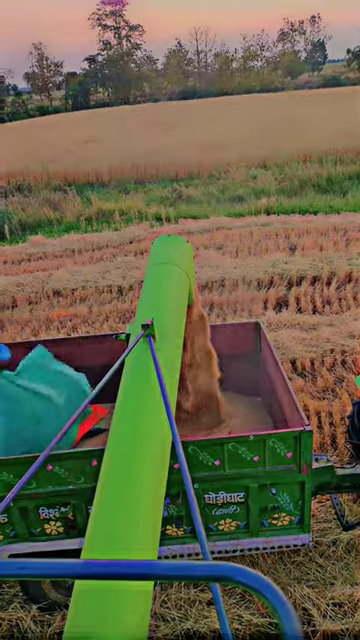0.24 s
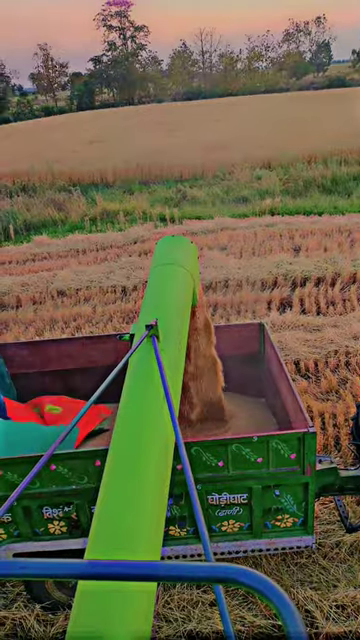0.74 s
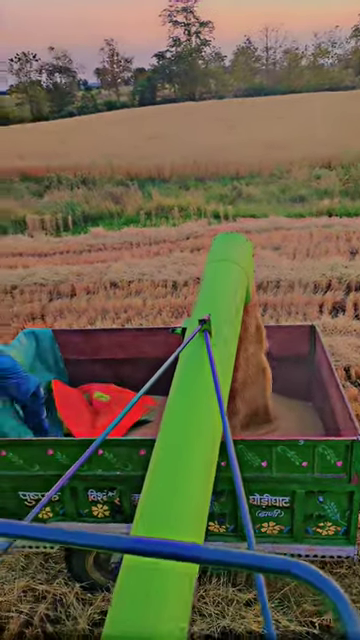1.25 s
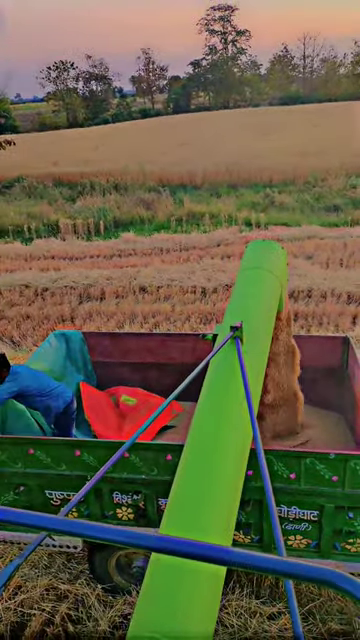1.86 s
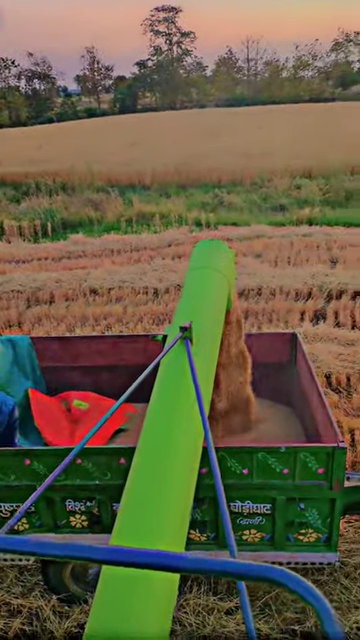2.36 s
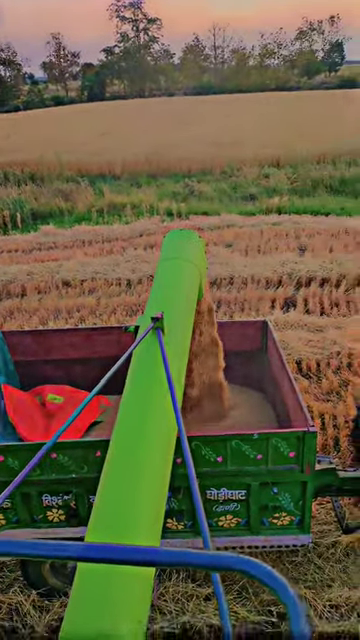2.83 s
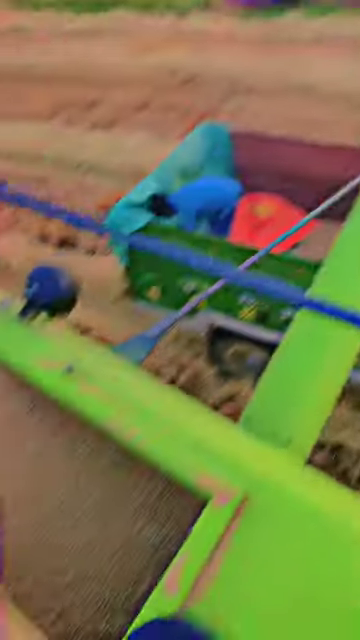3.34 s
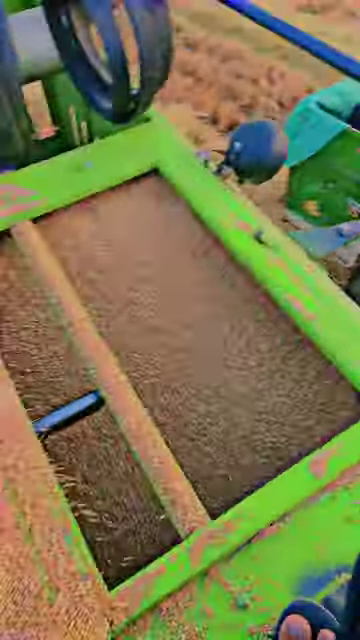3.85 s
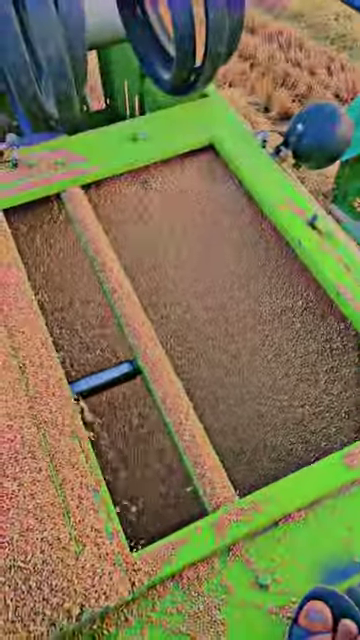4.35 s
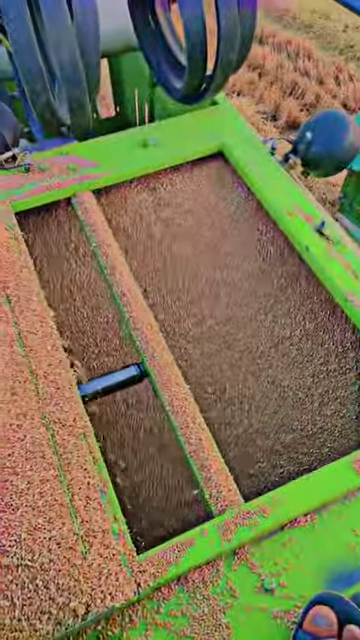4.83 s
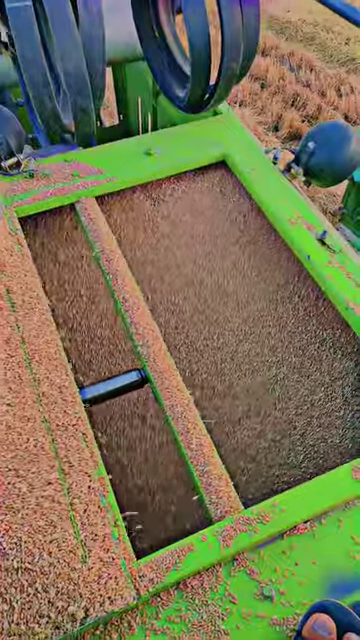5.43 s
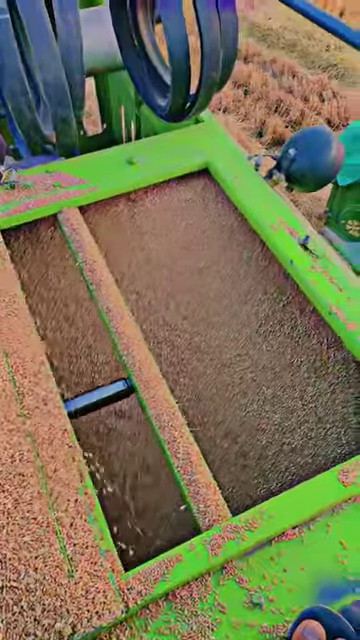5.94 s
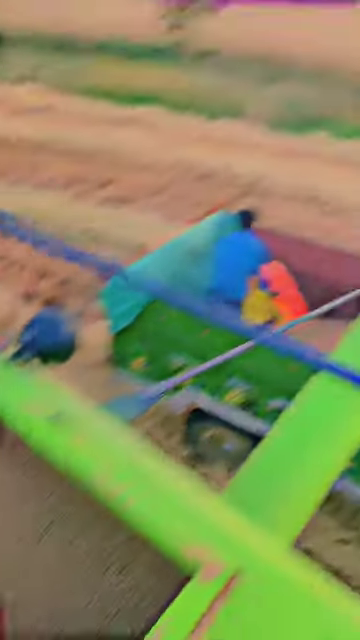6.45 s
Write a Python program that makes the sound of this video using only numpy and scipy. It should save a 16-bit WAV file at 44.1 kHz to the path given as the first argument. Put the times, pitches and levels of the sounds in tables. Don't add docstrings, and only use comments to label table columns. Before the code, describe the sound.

Continuous harvester machinery in an open field, heard from a handheld phone on top of the grain tank. Engine hum, auger drone and rattling panels fill everything, with thin whines and a fine kernel hiss above. It starts suddenly, slightly brighter for half a second, with rhythmic fading squeaks; later it becomes duller and boxier over the tank, with belt squeals near the middle and one faint squeal at the end.

```python
import sys
import numpy as np
from scipy import signal
from scipy.fft import rfft, irfft, next_fast_len
from scipy.io import wavfile
from scipy.ndimage import uniform_filter1d

SR = 44100
rng = np.random.default_rng(int(sys.argv[2]) if len(sys.argv) > 2 else 0)


def attenuation_scalar(level_db):
    decades = np.asarray(level_db, float) / 20
    return 10 ** decades


def wrap_up_sound(samples):
    columns = np.atleast_2d(samples).T
    tamed = np.clip(columns, -1, 1)
    steps = np.round(tamed * 32767).astype(np.int16)
    wavfile.write(sys.argv[1], SR, steps)


N = 295029
TIME = np.arange(N) / SR
START_S = .2513
CYCLE_HZ = 13.965
AUGER_HZ = 8.404


def columns(table):
    s, *rest = np.transpose(table)
    return [np.interp(TIME, s, c) for c in rest]


def unit(x):
    return x / np.sqrt(np.mean(x ** 2))


def colour(x, spectrum):
    hz, db = np.transpose(spectrum)
    size = next_fast_len(N)
    log_f = np.log(np.maximum(np.arange(size // 2 + 1) * SR / size, 1))
    log_hz = np.log(hz)
    outside = np.maximum(log_hz[0] - log_f, 0) + np.maximum(log_f - log_hz[-1], 0)
    gain = attenuation_scalar(np.interp(log_f, log_hz, db) - 60 * outside)
    return unit(irfft(rfft(x, size) * gain, size)[:N])


def walk(rate):
    hold = int(SR / rate)
    steps = np.repeat(rng.standard_normal(N // hold + 1), hold)
    return 1.06 * uniform_filter1d(uniform_filter1d(steps, hold), hold)[:N]


def beat(hz, duty, start):
    return np.exp(-((hz * TIME + start) % 1) / duty)


def particles(rate):
    return unit((rng.random(N) < rate / SR) * rng.standard_normal(N))


def tones(rows, waver_db, slip):
    out = np.zeros(N)
    for hz, db in rows:
        phase = 2 * np.pi * (hz * TIME + rng.random()) + slip * walk(3.04)
        out += np.sqrt(2) * attenuation_scalar(db + waver_db * walk(4.05)) * np.sin(phase)
    return out


def pose():
    # (time [s], share along the auger [0-1], share over the tank [0-1])
    aim = [
        (.25, 0.9, 0.07),
        (1.9, 0.69, 0.04),
        (2.4, 0.3, 0),
        (3.2, 0.21, 0.04),
        (3.5, 0.35, 0.16),
        (3.9, 0.2, 0.69),
        (6.0, 0.09, 0.77),
        (6.3, 0.17, 0.62),
        (6.69, 0.26, 0.2),
    ]
    along, tank = np.clip(columns(aim), 0, 1)
    return along, np.clip(1 - along - tank, 0, 1), tank


def heard(along_db, side_db, tank_db, unsettled_db, share, lead_s=0, opening_db=0):
    # (time [s], gain [dB])
    sway = [(.27, 1.5), (.4, -0.5), (.6, 0.3), (.7, -.8), (1.0, 1), (1.5, -1), (1.8, 0.1), (2.5, -0.24),
            (3.2, -0.7), (3.55, 0.6), (4.0, 0.4), (4.5, -0.6), (5.0, 0.4), (5.5, -.5), (5.75, -0.8),
            (6.0, -1.5), (6.45, 0), (6.69, 0.6)]
    settle_s, fade_s, opening_s = .64, 0.13, 0.055
    along, side, tank = pose()
    unsettled = np.clip(1 - (TIME + lead_s - settle_s) / fade_s, 0, 1)
    opening = np.exp(-np.maximum(TIME - START_S, 0) / opening_s)
    posed = (along * along_db + side * side_db + tank * tank_db) / (along + side + tank)
    return posed + unsettled_db * unsettled + opening_db * opening + share * columns(sway)[0]


def handling():
    settle = np.interp(TIME, [.3, .66, .72], [-56, -56, -68])
    rumble = colour(rng.standard_normal(N), [(15, 8.5), (40, 3.5), (90, -2), (130, -19.0)]) * attenuation_scalar(settle)
    from_bump = ((TIME - .6022) / .0011) ** 2
    return rumble - attenuation_scalar(-19) * (1 - .6 * from_bump) * np.exp(-.5 * from_bump)


def drone():
    # (frequency [Hz], level [dB per Hz])
    spectrum = [(40, -39.5), (62, -48.5), (80, -25.5), (107, -16.5), (157, -7), (221, -4.5), (256, -4.5),
                (301, -3.5), (342, -6), (406, -7), (510, -19), (620, -19.5)]
    puffs = 1 + .15 * beat(6 * CYCLE_HZ, .3, 0) * attenuation_scalar(3 * walk(60))
    return colour(puffs * rng.standard_normal(N), spectrum) * attenuation_scalar(.6 * walk(6))


def engine():
    # (multiple of the engine cycle [1], level [dB rms])
    exhaust_orders = [(6, -66), (8, -61), (10, -43), (11, -45), (12, -36), (18, -37), (45, -52.5),
                      (74, -52), (75, -50.5), (77, -54), (80, -50.5), (81, -52), (84, -52.5), (90, -64),
                      (98, -51), (104, -61), (108, -52.5)]
    # (multiple of the shaft turn [1], level [dB rms])
    auger_orders = [(33, -47), (38, -46), (39, -41), (42, -39), (44, -41), (46, -52.5), (48, -50.5)]
    gear_hz = [192.8, 262.8, 282.3, 332.1, 338.8, 347.2, 544.9, 664.2]
    gear_db = [-44.5, -51.5, -42, -44.5, -36.5, -41, -49, -47.5]
    exhaust = [(k * CYCLE_HZ, db) for k, db in exhaust_orders]
    drive = [(k * AUGER_HZ, db) for k, db in auger_orders] + list(zip(gear_hz, gear_db))
    along, _, _ = pose()
    facing = attenuation_scalar(4 * (1 - along) - 3)
    low_exhaust = tones([r for r in exhaust if r[0] < 700], waver_db=1.2, slip=.3)
    hum = facing * low_exhaust + tones(drive, waver_db=1.8, slip=.4)
    return hum, tones([r for r in exhaust if r[0] >= 700], waver_db=2.5, slip=.8)


def valve():
    along, _, _ = pose()
    blow = uniform_filter1d(beat(CYCLE_HZ, .15, .12), size=200) * attenuation_scalar(2.5 * walk(14))
    return np.maximum(along, .15) * blow * np.sin(2 * np.pi * 2990 * TIME + walk(40))


def whines():
    whine_hz = [1686, 1832, 2090, 2990, 3407, 3550, 3613, 3650, 3710, 3774, 3935, 3995, 4131, 4188, 4365,
                4414, 4585, 4926, 5285]
    # (width [Hz], level [dB rms], change over the tank [dB])
    rings = [(19.97, -49.5, -9.5), (20.08, -54.5, -11.5), (24.7, -50.5, -5.5), (25.05, -59.5, 2),
             (8, -66.5, -3), (15.3, -70.5, -4.5), (16.04, -65.5, -9), (14.67, -66.5, -3.5),
             (12.2, -71, -7.5), (7.9, -67, 1), (10.4, -72.5, -2), (8.06, -68, -13), (16, -64, -5.5),
             (22.4, -64, -4.5), (29.7, -64, -1), (25.6, -66, 2.5), (40.4, -69, 5), (25.6, -70.5, 9.5),
             (50.9, -66.5, 0.5)]
    out = np.zeros(N)
    _, _, tank = pose()
    for hz, (width, db, shade_db) in zip(whine_hz, rings):
        swell = 0.21 + walk(width) + 1j * walk(width)
        level = attenuation_scalar(db + shade_db * tank + 0.91 * walk(3))
        out += level * (swell * np.exp(2j * np.pi * hz * TIME)).real
    return out


def chirps(rows, wobble, grip_db):
    out = np.zeros(N)
    for s, length, hz, db in rows:
        swell = np.exp(-.5 * ((TIME - s) / length) ** 2)
        out += attenuation_scalar(db + grip_db) * swell * np.sin(2 * np.pi * hz * TIME + wobble)
    return out


def squeaks():
    # (time of peak [s], frequency [Hz], peak level [dB])
    stray = [(.297, 4590, -45), (.399, 4430, -45), (.435, 4410, -45), (.589, 4410, -45), (.644, 4410, -45),
             (.653, 4600, -46), (1.846, 4590, -52), (2.942, 4590, -46), (3.303, 4590, -45),
             (3.551, 4580, -45), (6.167, 4590, -50), (6.413, 4590, -50)]
    # (time of peak [s], length [s], frequency [Hz], peak level [dB])
    belt = [
        (0.32, .012, 3040, -37),
        (0.5, 0.016, 2960, -34),
        (.602, .012, 3070, -39),
        (3.66, 0.034, 3000, -44),
        (3.765, 0.034, 3000, -41),
        (3.817, .012, 3070, -44),
        (4.0, .02, 3020, -46.5),
        (6.57, .05, 3055, -48),
    ]
    run = [(.341 + k / AUGER_HZ, 4590, -43 - .6 * k) for k in range(8)]
    rows = [(s, .01, hz, db) for s, hz, db in run + stray]
    bearing = chirps(rows, wobble=.35 * walk(50), grip_db=2.5 + .8 * walk(70))
    return bearing + chirps(belt, wobble=1.0 * walk(70), grip_db=4 * walk(60) - 1)


def grain():
    # (frequency [Hz], level [dB per Hz])
    spectrum = [(3300, -26.5), (3700, -18), (3950, -11.5), (4270, 0.5), (4600, 1), (5100, -5), (5590, -7),
                (6490, -7.5), (6900, -13.5), (7250, -16), (7500, -26.5)]
    push = 1 + 0.45 * beat(2 * AUGER_HZ, .3, 0.55)
    kernels = rng.standard_normal(N) + 0.37 * particles(3300)
    return colour(push * kernels, spectrum) * attenuation_scalar(0.61 * walk(8))


def rattle():
    cycles = rng.standard_normal((2, round(SR / CYCLE_HZ)))
    return unit(sum(np.resize(cycle, N) * (1 + .5 * walk(2)) for cycle in cycles))


def panels(roar_db, clatter_db):
    # (frequency [Hz], level [dB per Hz])
    along_spectrum = [(400, -7.5), (480, -8), (577, -14.5), (680, -10.5), (812, -5), (936, -6), (1070, 0),
                      (1430, -10), (1660, -7.5), (1940, -12), (2130, -14.5), (2450, -15.5), (3500, -14.5),
                      (3850, -26.5)]
    # (frequency [Hz], level [dB per Hz])
    side_spectrum = [(400, -8.5), (480, -0.5), (520, -18.5), (608, -4), (658, -12), (790, -1), (940, -8),
                     (1050, -3.5), (1300, -9.5), (1790, -9.5), (1950, -13.5), (2130, -6), (2490, -21),
                     (3800, -32)]
    # (frequency [Hz], level [dB per Hz])
    tank_spectrum = [(280, -33.5), (480, -6.5), (587, -5), (676, 2.5), (706, -2.5), (812, -4), (926, -14),
                     (1040, -5), (1090, -2), (1770, -25), (2370, -15), (3900, -32), (5070, -57.5),
                     (8580, -120)]
    knocks = 1 + 0.24 * beat(28.9, 0.36, .2) + 0.38 * beat(CYCLE_HZ, 0.39, 0.57)
    shake = knocks * attenuation_scalar(0.22 * walk(8.1)) * (rng.standard_normal(N) + .3 * particles(2000))
    shake = shake + .45 * rattle()
    along, side, tank = pose()
    sound = along * colour(shake, along_spectrum) + side * colour(shake, side_spectrum)
    sound = sound + tank * colour(shake, tank_spectrum)
    roar = signal.sosfiltfilt(signal.butter(2, 1500, fs=SR, output="sos"), sound)
    roar, clatter = [v / np.sqrt(uniform_filter1d(v ** 2, size=22050)) for v in (roar, sound - roar)]
    return roar * attenuation_scalar(roar_db) + clatter * attenuation_scalar(clatter_db)


def scene():
    # (along [dB], sideways [dB], over the tank [dB],
    # extra before the noise reduction settles [dB], share of the sway [1])
    drone_level = (-26, -27, -25, 2, 0.5)
    roar_level = (-27.5, -32.5, -32, 1, 1.5)
    clatter_level = (-32, -41, -39.5, 4, -0.6)
    hiss_level = (-51, -53, -53.5, 4, 0)
    drone_db = heard(*drone_level, opening_db=-1.5)
    roar_db = heard(*roar_level, opening_db=1.5)
    clatter_db = heard(*clatter_level, lead_s=0.14)
    hiss_db = heard(*hiss_level)
    hum, upper = engine()
    bass_rise = np.clip((TIME - START_S) / .008, 0, 1)
    low = bass_rise * attenuation_scalar(drone_db) * (attenuation_scalar(-3.5) * drone() + attenuation_scalar(26.5) * hum)
    middle = panels(roar_db - .5, clatter_db - .5) + attenuation_scalar(roar_db + 30.5) * upper
    middle = middle + attenuation_scalar(clatter_db - 5.0) * valve()
    high = attenuation_scalar(hiss_db) * (attenuation_scalar(2.0) * grain() + attenuation_scalar(55.5) * whines())
    return (low + middle + high + squeaks() + handling())[None]


def top_cut(x):
    return signal.sosfilt(signal.butter(12, 7670, fs=SR, output="sos"), x)


def record(dry):
    opened = dry * np.clip((TIME - START_S) / 0.0007, 0, 1)
    thin = signal.sosfilt(signal.butter(3, 70, "high", fs=SR, output="sos"), opened)
    narrow = signal.sosfilt(signal.butter(16, 7400, fs=SR, output="sos"), thin)
    return top_cut(narrow)


dry = scene()
out = record(dry)
wrap_up_sound(out)
```